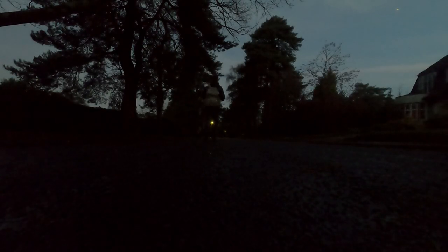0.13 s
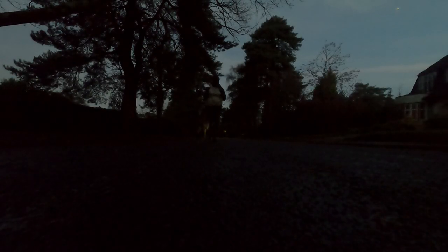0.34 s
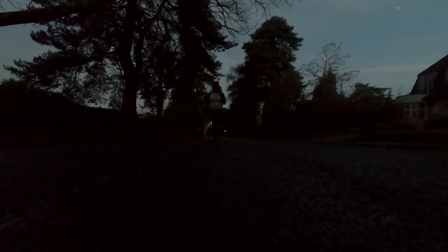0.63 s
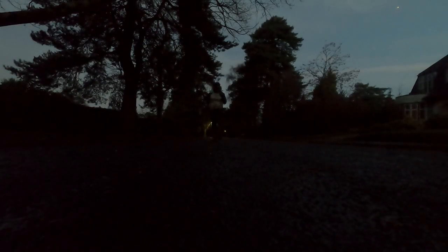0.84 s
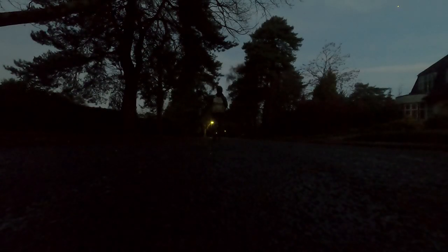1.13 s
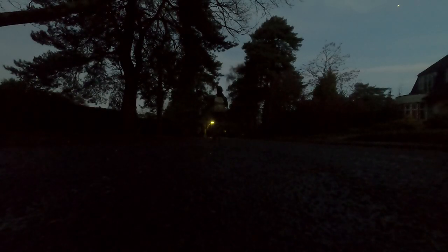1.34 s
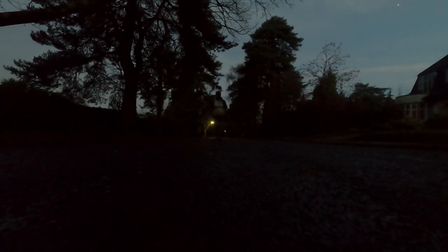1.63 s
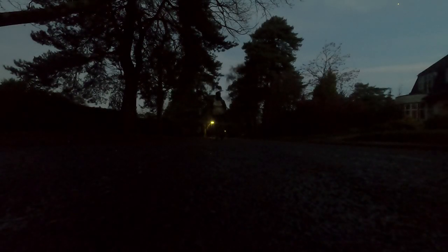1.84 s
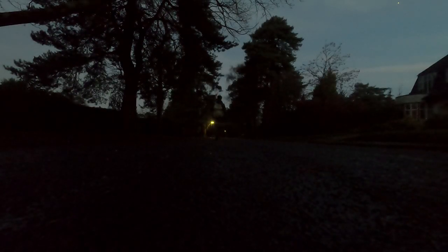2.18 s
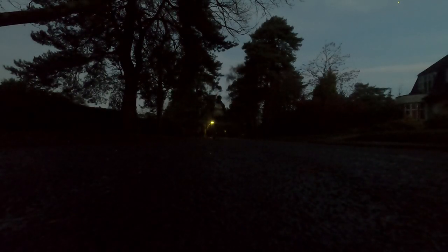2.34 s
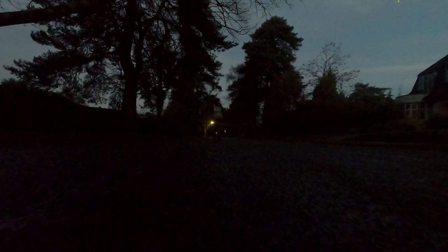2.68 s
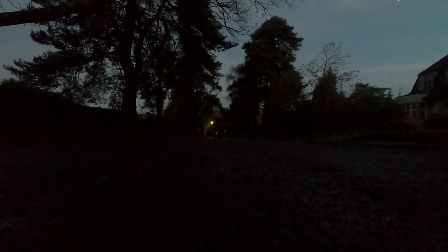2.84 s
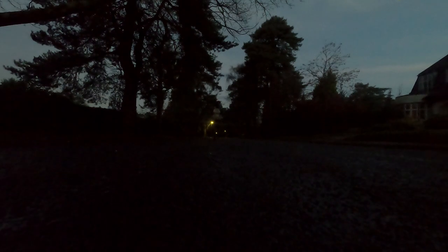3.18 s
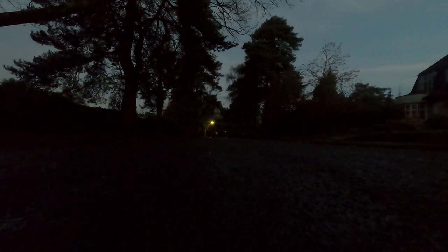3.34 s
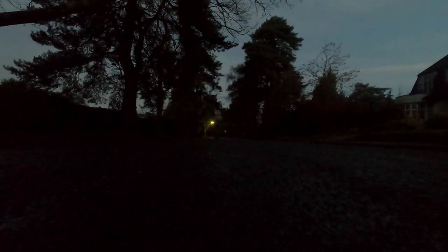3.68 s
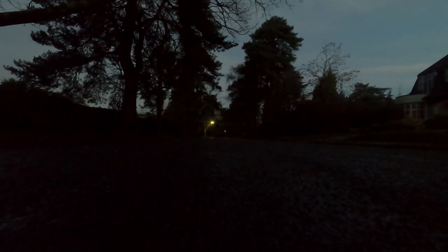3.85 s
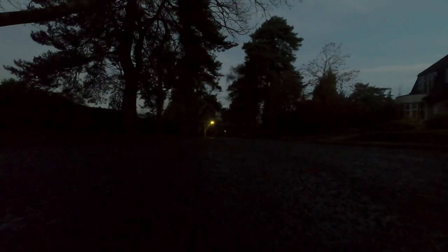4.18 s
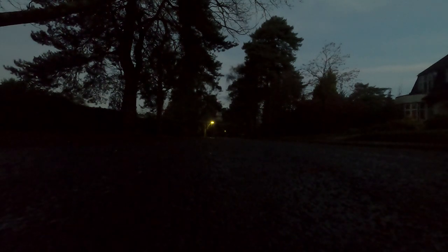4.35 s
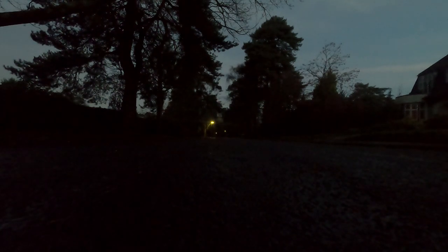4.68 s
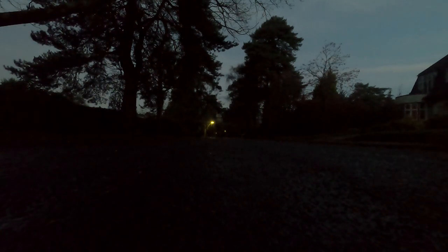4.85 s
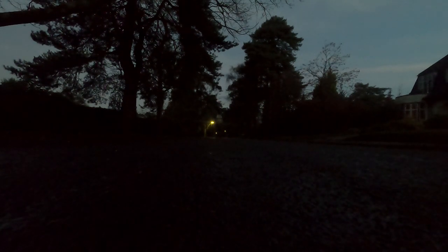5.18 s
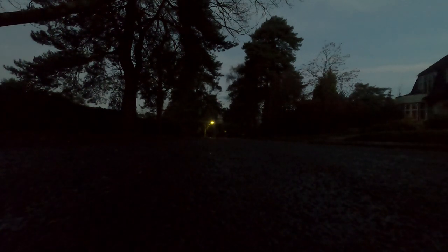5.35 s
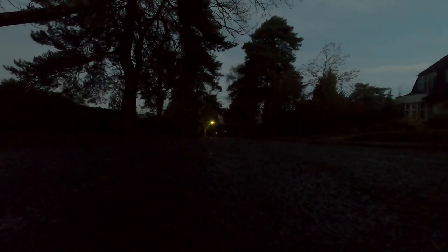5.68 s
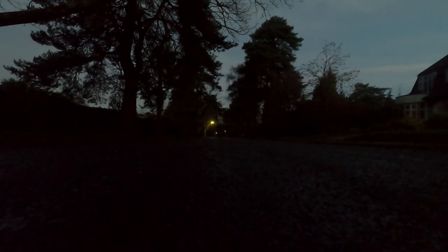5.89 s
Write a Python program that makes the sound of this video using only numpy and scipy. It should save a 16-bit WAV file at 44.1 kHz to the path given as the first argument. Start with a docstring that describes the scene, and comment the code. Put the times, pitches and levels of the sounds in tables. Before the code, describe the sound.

Small birds sing in the open at dawn, scattering high whistles, buzzy syllables and quick slurred chirps among tall trees that give a soft, diffuse echo. A fainter chorus twitters behind them. Distant traffic makes a steady dull roar. A few faint ticks and leafy rustles sit close by early on. Low wind buffets the microphone, with a gust past the middle and stronger bumps near the end.

```python
"""Dawn chorus on a tree-ringed lawn

Birds whistle, buzz, slur and trill: near-pure tones on gliding, warbled pitch paths, which trunks
and crowns scatter into a soft tail. Far calls are heard only through that scattering. Distant traffic
is coloured noise, wind buffets the microphone as noise swelling with the gusts, and close by there are
faint ticks (short ringing bursts) and rustles (grainy noise)."""
import sys
import numpy as np
from scipy import signal
from scipy.fft import rfft, irfft, next_fast_len
from scipy.io import wavfile
from scipy.ndimage import uniform_filter1d

SR = 44100
rng = np.random.default_rng(int(sys.argv[2]) if len(sys.argv) > 2 else 0)


def unload_wav(signal):
    """Save mono or channel-first audio to the path in sys.argv[1] as 16-bit WAV at rate SR, clipped to [-1, 1]."""
    wavfile.write(
        sys.argv[1],
        SR,
        np.round(np.clip(np.atleast_2d(signal).T, -1, 1) * 32767).astype(np.int16),
    )


N = 265437
TIME = np.arange(N) / SR

# spectrum of airy hiss: f/Hz, relative density/dB
AIR_COLOUR = [(1500, 1), (2500, 5.5), (3500, 4), (4500, 0), (6000, -4), (8300, -8), (9300, -20),
              (11000, -26.5), (15500, -32)]
# how strongly the far chorus sings: t/s, relative level/dB
CHORUS_SWELL = [(0, 6.5), (.8, 1.5), (2.3, 2), (3, -1), (3.6, 0), (4.2, -2), (4.8, 0), (6.02, -1)]


def undb(db):
    """Decibels to gain."""
    return 10 ** (np.asarray(db) / 20)


def unit(x):
    """Scale to rms 1."""
    return x / np.sqrt(np.mean(x ** 2) + 1e-30)


def curve(rows):
    """A table of times and levels as a line through time, its corners rounded over 400 samples."""
    s, level = np.transpose(rows)
    return uniform_filter1d(np.interp(TIME, s, level), size=400)


def add(out, s, x):
    """Mix x into out from time s."""
    i = int(np.clip(s * SR, 0, N - 1))
    out[i:i + len(x)] += x[:N - i]


def walk(rate_hz):
    """Smooth random wandering of rms 1: white noise with a soft lowpass near rate_hz."""
    hz = np.fft.rfftfreq(N, 1 / SR)
    spectrum = rfft(rng.standard_normal(N))
    return unit(irfft(spectrum * np.exp(-(hz / rate_hz) ** 2), N))


def noise(colour):
    """Noise of rms 1 with the given spectrum, falling away past its last point."""
    hz, db = np.transpose(colour)
    size = next_fast_len(N, True)
    f = np.fft.rfftfreq(size, 1 / SR) + 1e-3
    gain = undb(np.interp(np.log(f), np.log(hz), db))
    gain = gain * np.minimum(1, hz[-1] / f) ** 2
    spectrum = rfft(rng.standard_normal(size))
    return unit(irfft(spectrum * gain, size)[:N])


def steady(x, span_s):
    """Even out the slow swells of a noise, keeping its quick flutter."""
    power = uniform_filter1d(x ** 2, int(span_s * SR))
    return x / np.sqrt(power + 1e-9)


def sweep(length_s, *pitches_hz):
    """A smooth pitch path: the polynomial through evenly spaced pitches."""
    order = len(pitches_hz) - 1
    shape = np.polyfit(np.linspace(0, 1, order + 1), pitches_hz, order)
    return np.polyval(shape, np.linspace(0, 1, max(int(length_s * SR), 32)))


def note(glide_hz, warble_hz=0, warble_rate_hz=105, attack=0.053, release=0.055, jitter_hz=10,
         rough=0.35, throb=0.05, flicker_db=4.5):
    """One syllable of rms 1: a near-pure tone along a pitch path; an uneven warble makes it buzzy."""
    u = np.linspace(0, 1, len(glide_hz))  # attack and release are shares of the length
    chance = rng.standard_normal((3, 80))
    knots_s = np.arange(80) / 250
    drift, jitter, flicker = (np.interp(TIME[:len(u)], knots_s, c) for c in chance)

    warble = np.sin(2 * np.pi * np.cumsum(warble_rate_hz * (1 + .3 * drift)) / SR)
    # the deeper the warble, the more it roughens the pitch
    hz = glide_hz + warble_hz * (warble + rough * jitter) + jitter_hz * jitter
    tone = np.sin(2 * np.pi * np.cumsum(hz) / SR)

    ramp = np.clip(np.minimum(u / attack, (1 - u) / release), 0, 1)
    swell = np.sin(np.pi / 2 * ramp) ** 2
    # the air flow throbs with the warble and flickers by itself
    flow = (1 + throb * np.tanh(warble_hz / 150) * warble) * undb(flicker_db * flicker)
    return unit(swell * flow * tone)


def trees(x, t60_s, early_db, early_s, delay_s=0.016, treble_share=0.33, split_hz=5200, clump_db=1.5):
    """Scattering in the wood: early reflections off trunks, and a diffuse tail whose treble dies sooner."""
    t = TIME[:SR]
    # crowns stand in clumps, so the tail comes back in uneven waves
    scatter = rng.standard_normal(SR) * undb(clump_db * walk(35)[:SR])
    low = signal.sosfiltfilt(signal.butter(2, split_hz, fs=SR, output="sos"), scatter)
    treble = scatter - low
    tail = low * undb(-60 * t / t60_s) + treble * undb(-60 * t / (t60_s * treble_share))
    tail = tail * (1 - np.exp(-t / delay_s))

    # sparse clicks of either sign, about 600 per second, dying away
    hits = rng.choice([-1, 1], SR) * (rng.random(SR) < 600 / SR)
    trunks = hits * np.exp(-t / early_s)
    response = tail / np.linalg.norm(tail) + undb(early_db) * trunks / np.linalg.norm(trunks)
    return signal.fftconvolve(x, response)[:N]


def distance(traffic_db=3.0, air_db=-65.5, waver_db=.5):
    """Tyre roar from far roads, robbed of its treble, and a faint hiss that swells with the far chorus."""
    # swell of the traffic, ahead of the traffic_db trim: t/s, level/dB
    traffic_swell = [(0.0, -42.5), (3.02, -43), (3.7, -45.5), (4.27, -43.5), (5.93, -44), (6.02, -42.5)]
    # spectrum of the roar: f/Hz, relative density/dB
    traffic_colour = [(60, 1.5), (250, 3), (400, 1.5), (570, -0.5), (800, 2.5), (1050, 0.5), (1400, -4),
                      (1800, -11), (2300, -21.5), (3000, -40.5), (5000, -63)]
    roads_db = curve(traffic_swell) + traffic_db + waver_db * walk(4.2)
    hiss_db = air_db + 1.55 * curve(CHORUS_SWELL) + 1.0 * walk(15.0)
    return noise(traffic_colour) * undb(roads_db) + noise(AIR_COLOUR) * undb(hiss_db)


def wind(eddy_db=-1.5, gust_from_db=-31, gust_span_db=9, hiss_db=-50, flutter_db=1.5):
    """Wind presses on the microphone; strong gusts are brighter, and smaller eddies flutter on top."""
    # strength of the buffeting: t/s, level/dB
    buffet_swell = [(0.0, -32.5), (0.1, -31.5), (0.55, -35), (0.74, -27), (0.8, -36.5), (0.94, -30),
                    (1.71, -39.5), (1.81, -33), (2.5, -36), (3.32, -20.5), (3.44, -31), (3.45, -23),
                    (3.55, -13.5), (3.59, -26.5), (3.7, -26), (3.8, -37.5), (3.85, -29), (4.44, -34.5),
                    (4.46, -52), (4.53, -27), (4.69, -37.5), (4.78, -25.5), (4.84, -37), (5.05, -38.5),
                    (5.08, -18.5), (5.13, -31), (5.2, -23.5), (5.26, -34), (5.35, -28), (5.4, -41),
                    (5.43, -25), (5.53, -33), (5.58, -19), (5.63, -24.5), (5.65, -19), (5.83, -23),
                    (5.87, -16.5), (5.93, -19), (5.97, -48), (6.02, -19.5)]
    # swell of the smaller eddies, ahead of the eddy_db trim: t/s, level/dB
    eddy_swell = [(0.0, -44), (0.03, -37), (0.27, -43.5), (1.04, -36.5), (1.29, -46.5), (1.36, -38.5),
                  (1.78, -49.5), (1.83, -37.5), (2.48, -45.5), (3.57, -32.5), (3.65, -37.5), (3.92, -30.5),
                  (4.12, -37), (5.05, -40), (5.11, -37), (5.15, -42), (5.61, -31), (5.65, -28), (5.73, -33),
                  (5.75, -36), (5.83, -24.5), (6.02, -43)]
    # spectra of gentle buffets, strong gusts and small eddies: f/Hz, relative density/dB
    buffet_colour = [(8, -8), (20, 0.5), (40, 5), (70, -1.5), (110, -7), (150, -23), (300, -41.5),
                     (600, -81.5)]
    gust_colour = [(8, -20), (25, 8.5), (50, 3), (85, 5), (120, -4), (170, -6), (300, -24.5), (600, -76.5)]
    eddy_colour = [(60, -8), (110, -6), (150, 0.5), (220, -3.5), (320, -11.5), (500, -21), (1000, -43.5),
                   (3000, -80.5)]

    buffet_db = curve(buffet_swell)
    # crossfade from buffet to gust colour as the level climbs
    gust = np.clip((buffet_db - gust_from_db) / gust_span_db, 0, 1)
    pressure = np.sqrt(1 - gust) * noise(buffet_colour) + np.sqrt(gust) * noise(gust_colour)
    hiss = undb(hiss_db) * noise(AIR_COLOUR)  # rides on the buffets
    buffets = (steady(pressure, span_s=0.082) + hiss) * undb(buffet_db)
    eddies = steady(noise(eddy_colour), span_s=.07) * undb(curve(eddy_swell) + eddy_db)
    return (buffets + eddies) * undb(flutter_db * walk(25.0))


def far_chorus(count=30, spread=0.24, bend=0.045):
    """Many birds further off, each call at its own strength, heard only as scattered sound."""
    # registers in which they sing: f/Hz, level ahead of the random drop and the chorus swell/dB
    registers = [(3100, -67.5), (4000, -65), (5100, -79), (6100, -81.5)]
    song = np.zeros(N)
    for pitch, db in registers:
        for k, (when, length, warble, high, slope, loud) in enumerate(rng.random((count, 6))):
            hz = pitch * (1 + spread * (high - .5))
            glide = bend * (2 * slope - 1)  # falling if positive, rising if negative
            path = sweep(0.031 + 0.071 * length, hz * (1 + glide), hz * (1 - glide))
            call = note(path, warble_hz=40 + 160 * warble)
            start_s = (k + when) / count * N / SR
            add(song, start_s, undb(db - 5 + 4 * loud) * call)
    echoes = trees(song, t60_s=0.65, early_db=-8.5, early_s=0.045)
    return echoes * undb(curve(CHORUS_SWELL) - 9.8)


def rustles(grain_db=3.5):
    """Brief swishes of noise made grainy by a fast random level, perhaps dry leaves stirring."""
    # soft swishes close by: t/s, length/s, level at the crest/dB
    swishes = [(0.127, 0.06, -55.5), (0.598, 0.19, -60.5), (1.144, 0.22, -57.5), (2.764, 0.075, -63),
               (3.233, 0.18, -65), (3.768, 0.11, -64.5)]
    # their spectrum, ahead of the graininess: f/Hz, relative density/dB
    rustle_colour = [(2000, 1.5), (4000, 2), (7500, 0.5), (9500, -10.5), (12000, -30.5), (15500, -33)]
    swell = np.zeros(N)
    for s, length_s, db in swishes:
        add(swell, s, undb(db) * np.hanning(int(length_s * SR)))
    return swell * unit(noise(rustle_colour) * undb(grain_db * walk(150)))


def ticks(width=0.7):
    """Each tick is a very short burst ringing one broad resonance (width: bandwidth / centre)."""
    # faint ticks, perhaps drops or twigs: t/s, peak level/dB, centre f/Hz
    tick_rows = [(0.145, -41, 7040), (0.351, -37.5, 2140), (.587, -46, 3200), (0.643, -42, 3820),
                 (.718, -43, 3420), (1.13, -43, 3080), (1.24, -57, 6900), (1.281, -38, 4600),
                 (3.818, -43, 3700), (4.356, -43, 2580)]
    out, t = np.zeros(N), TIME[:1024]
    for s, db, hz in tick_rows:
        burst = rng.standard_normal(len(t)) * t * np.exp(-t / .001)
        tick = signal.lfilter(*signal.iirpeak(hz, 1 / width, fs=SR), burst)
        top_hz = min(hz * (1 + width / 2), 12000)
        tick = signal.sosfilt(signal.butter(8, top_hz, fs=SR, output="sos"), tick)
        # start early: the burst is strongest about 1 ms in
        add(out, s - .001, undb(db) * tick / np.abs(tick).max())
    return out


def trill(count=8, start_s=2.895, period_s=0.03, level_db=-74.5):
    """Tiny high down-sweeps, one straight after another, each a little higher than the last."""
    base_hz, rise_hz_per_s, fall_hz = 6600, 1000, 240  # each falls from fall_hz above to as much below
    song = np.zeros(N)
    for t in period_s * np.arange(count):
        hz = base_hz + rise_hz_per_s * t
        path = sweep(period_s, hz + fall_hz, hz - fall_hz)
        add(song, start_s + t, note(path, release=.3))
    return undb(level_db) * song


def sweeps(direct_db=3.0, wood_db=-8.5, sag=0.022):
    """Short clean slurs and flicks, and the trill, from birds in the open, with a lighter tail."""
    # slurs: t/s, length/s, start f/Hz, end f/Hz, level ahead of the direct and wood gains/dB
    slurs = [(1.627, .02, 3150, 2780, -50.5), (1.672, 0.0088, 3350, 3500, -56),
             (1.698, 0.02, 3490, 3660, -50), (1.734, 0.014, 3420, 2500, -49),
             (1.779, .011, 3450, 3300, -54), (1.833, .01, 3630, 3760, -50.5),
             (1.889, 0.01, 3530, 3700, -58), (3.191, 0.028, 7680, 8100, -72.5),
             (3.283, .024, 8800, 7640, -71), (3.478, 0.0088, 3500, 2890, -60),
             (3.508, 0.013, 3530, 3300, -60.5), (3.532, 0.05, 3560, 2640, -55),
             (3.557, .032, 7900, 7850, -74), (3.638, 0.029, 3530, 2610, -55.5),
             (3.754, 0.03, 3340, 2840, -64), (3.868, 0.035, 3270, 2730, -66), (3.98, 0.02, 3370, 2900, -66),
             (4.083, .028, 3320, 2840, -66.5), (4.804, 0.015, 4420, 3330, -51.5),
             (4.823, 0.013, 4150, 3490, -50), (5.645, .018, 3140, 2810, -55),
             (5.685, 0.018, 3140, 3420, -56.5), (5.715, 0.018, 3570, 3140, -53),
             (5.744, .02, 3420, 3590, -54), (5.799, .025, 3120, 2560, -51), (5.913, 0.012, 3250, 2520, -54)]
    song = trill()
    for s, length_s, start_hz, end_hz, db in slurs:
        middle_hz = (start_hz + end_hz) / 2 * (1 - sag)  # sags below the straight line
        path = sweep(length_s, start_hz, middle_hz, end_hz)
        slur = note(path, jitter_hz=50, attack=0.078, release=0.093, flicker_db=1.5)
        add(song, s, undb(db) * slur)
    tail = trees(song, t60_s=0.96, early_db=8.0, early_s=0.02)
    return undb(direct_db) * song + undb(wood_db) * tail


def syllables(quaver=0.0067, buzz_rise=.015, buzz_wood_db=2):
    """Whistles slide and settle; buzzes warble around a gently rising pitch.

    Yields t/s, level/dB, extra scattering/dB and the sound; quaver and rise are shares of the pitch."""
    # clear whistles, each sliding onto its pitch (from below if the slide is negative):
    # t/s, length/s, f/Hz, slide from above/Hz, settling time/s, level ahead of the perch gains/dB,
    # extra scattering/dB
    whistle_rows = [(0.058, 0.033, 6260, 0, .03, -58, 2), (0.603, .1, 7580, 405, .09, -65.5, 0),
                    (0.737, 0.18, 7540, 150, .08, -68, -0.5), (0.77, 0.064, 6600, 653, .07, -67, -5),
                    (0.94, 0.03, 6180, 29, .02, -61, -1), (1.028, 0.11, 6060, 65, .08, -65.5, -1),
                    (1.063, 0.049, 7980, 180, .04, -74, -4), (1.121, 0.059, 7800, 281, .06, -63.5, -1),
                    (1.216, 0.086, 7530, 251, .06, -57.5, -3), (1.223, 0.066, 4090, 10, .02, -53.5, -4),
                    (1.26, 0.051, 4077, 8, .02, -44.5, -6.5), (1.324, 0.088, 4073, -6, .02, -51.5, -9.5),
                    (1.308, 0.14, 7300, 254, .1, -66.5, -2), (1.486, 0.032, 7330, 1, .02, -64, -4),
                    (1.588, 0.039, 3920, 259, .016, -52, 4.5), (1.647, 0.017, 3890, 59, .01, -46, 3.5),
                    (1.757, 0.053, 4300, 89, .05, -53.5, -2), (1.808, 0.065, 4330, 17, .02, -52.5, -4),
                    (1.971, 0.029, 7640, -1, .02, -63.5, -5), (1.993, 0.16, 6570, 203, .015, -68, 0),
                    (2.2, 0.069, 7300, 447, .03, -66.5, 0.5), (2.234, 0.086, 3930, 327, .018, -51, 0.5),
                    (2.505, 0.023, 7680, 6, .02, -59.5, 0.5), (2.606, 0.042, 5500, 1197.5, .075, -58, 1),
                    (2.669, 0.12, 4660, 197, .008, -56, -7), (2.687, .067, 6500, 45, .03, -70.5, 0.5),
                    (2.716, 0.087, 3490, 282, 0.0084, -49, -2),
                    (2.809, 0.055, 2720, -190, 0.023, -50.5, -8), (3.366, 0.069, 7890, -1, .02, -62, -3),
                    (3.537, 0.14, 7330, 6, .05, -63.5, -12), (3.797, 0.067, 3915, -1, .02, -58, -7.5),
                    (4.063, 0.076, 3920, 0, .02, -65, -5), (4.492, 0.084, 8370, 2, .03, -71.5, 0),
                    (4.643, 0.057, 3560, 779, .022, -53.5, 2.5), (4.676, 0.078, 4100, 122, .012, -54.5, -5),
                    (4.705, 0.043, 3640, 66, .02, -54, -7.5), (4.769, 0.038, 3610, 380, .02, -47.5, -4),
                    (4.846, .11, 3330, 421, .06, -55, -4.5), (4.884, 0.035, 3950, 103, .03, -54.5, -3),
                    (4.99, 0.087, 3950, -1.5, .02, -64, -8), (5.019, .135, 7340, -82, .04, -53, -2.5),
                    (5.208, 0.12, 7380, 103, .05, -62, 2), (5.372, 0.057, 7110, 151, .03, -64.5, 0),
                    (5.47, 0.055, 7130, -1.5, .03, -65, -0.5), (5.666, .03, 4160, -6, .02, -53.5, -1),
                    (5.962, 0.096, 3660, 850, .007, -47, 2)]
    # buzzy syllables: t/s, length/s, f/Hz, warble depth/Hz, warble rate/Hz,
    # level ahead of the perch gains/dB
    buzz_rows = [(0, 0.036, 3900, 494, 105, -57), (0.073, 0.26, 6300, 560, 100, -61.5),
                 (0.259, 0.32, 6040, 380, 105, -69), (0.413, 0.12, 4580, 170, 110, -70),
                 (0.735, 0.14, 5350, 200, 62, -71.5), (0.858, 0.056, 6160, 250, 64, -70),
                 (.965, .04, 5520, 90, 64, -70), (1.006, 0.07, 4870, 330, 120, -71),
                 (1.206, 0.069, 4110, 240, 104, -56), (1.35, 0.063, 5100, 110, 66, -67),
                 (1.357, 0.071, 6000, 160, 81, -72), (1.532, 0.022, 5470, 350, 110, -73),
                 (1.558, 0.047, 4550, 190, 72, -61.5), (1.601, 0.027, 3270, 91, 85, -54),
                 (1.653, 0.064, 3180, 249, 91, -53.5), (1.745, 0.048, 3334, 210, 62, -51.5),
                 (1.827, 0.089, 3700, 231, 52, -57), (1.947, .03, 3470, 160, 60, -55.5),
                 (2.183, .04, 5450, 400, 105, -66.5), (2.196, 0.09, 4620, 90, 110, -60),
                 (2.302, 0.054, 7600, 200, 135, -61.5), (2.868, 0.073, 2880, 130, 81, -67.5),
                 (2.922, 0.049, 3250, 130, 76, -63), (3.228, 0.075, 8460, 300, 50, -73.5),
                 (3.44, 0.15, 7680, 380, 40, -71.5), (4.49, .11, 5700, 218, 70, -75),
                 (4.533, 0.083, 7670, 60, 91, -79), (4.642, 0.079, 4330, 200, 95, -65),
                 (4.656, 0.067, 4750, 240, 120, -69), (4.767, .036, 4180, 221, 120, -56),
                 (4.904, 0.05, 5200, 460, 81, -70.5), (5.002, 0.045, 6200, 700, 105, -67.5),
                 (5.202, 0.034, 5560, 900, 120, -77), (5.345, 0.096, 7820, 170, 45, -71),
                 (5.416, 0.036, 5830, 250, 70, -72), (5.624, 0.021, 2760, 170, 45, -57.5),
                 (5.746, 0.035, 3950, 250, 73, -58), (5.721, 0.061, 3445, 230, 62, -51.5),
                 (5.773, 0.045, 4530, 160, 100, -53.5), (5.846, 0.027, 3680, 330, 90, -52),
                 (5.924, 0.1, 2000, 140, 76, -56)]
    for s, length_s, hz, slide_hz, settle_s, db, wood_db in whistle_rows:
        glide = hz + slide_hz * np.exp(-TIME[:int(length_s * SR)] / settle_s)
        whistle = note(glide, quaver * hz, jitter_hz=0.0035 * hz, attack=0.052, release=0.11,
                       flicker_db=4.0)
        yield s, db, wood_db, whistle
    for s, length_s, hz, warble_hz, rate_hz, db in buzz_rows:
        glide = sweep(length_s, hz * (1 - buzz_rise), hz * (1 + buzz_rise))
        buzz = note(glide, warble_hz, rate_hz, attack=0.13, release=0.21, flicker_db=2.0)
        yield s, db, buzz_wood_db, buzz


def whistlers(near_db=-47, far_db=-75, near_direct_db=-1.6, far_direct_db=-2.5,
              near_wood_db=-6, far_wood_db=-2, count=5):
    """Birds on several perches, each with its own echoes: fainter notes arrive more by way of the trees."""
    direct, scattered = np.zeros(N), np.zeros((count, N))
    for k, (s, db, wood_db, syllable) in enumerate(syllables()):
        far = np.clip((near_db - db) / (near_db - far_db), 0, 1)  # a faint note counts as far
        direct_gain_db = np.interp(far, [0, 1], [near_direct_db, far_direct_db])
        wood_gain_db = wood_db + np.interp(far, [0, 1], [near_wood_db, far_wood_db])
        add(direct, s, syllable * undb(db + direct_gain_db))
        add(scattered[k % count], s, syllable * undb(db + wood_gain_db))  # perches take turns
    echoes = sum(trees(perch, t60_s=1.0, early_db=0.5, early_s=0.096, clump_db=5.0) for perch in scattered)
    return direct + echoes


def scene():
    """Everything meets at one microphone."""
    background = distance() + wind() + far_chorus()
    close_by = rustles() + ticks()
    birds = sweeps() + whistlers()
    return (background + close_by + birds)[None]


def record(dry, top_hz=15700, fade_s=.003):
    """The recorder opens and closes softly and cuts the very top."""
    fade = np.clip(np.minimum(TIME, TIME[-1] - TIME) / fade_s, 0, 1)
    lowpass = signal.ellip(8, .2, 70, top_hz, fs=SR, output="sos")
    return signal.sosfilt(lowpass, dry * fade)


dry = scene()
out = record(dry)
unload_wav(out)
```